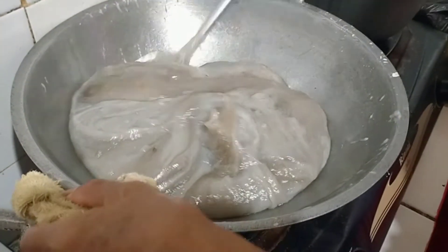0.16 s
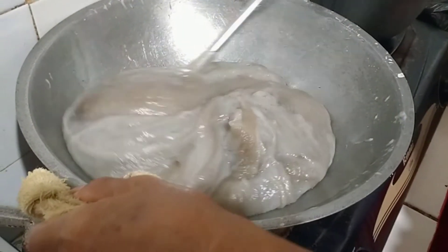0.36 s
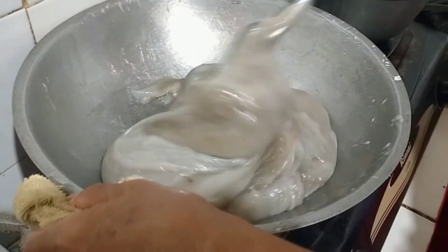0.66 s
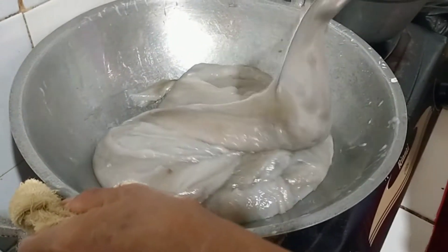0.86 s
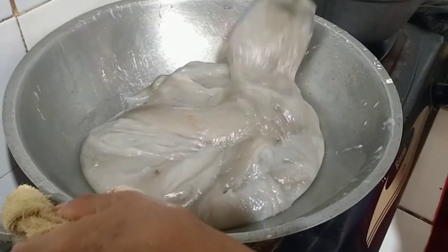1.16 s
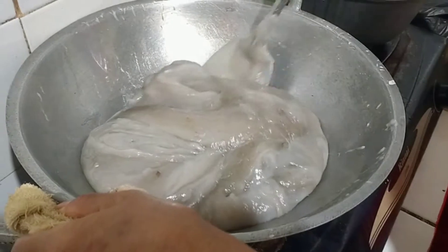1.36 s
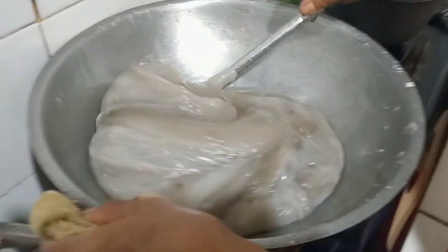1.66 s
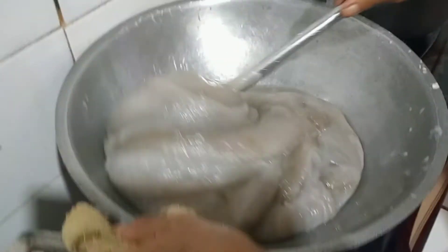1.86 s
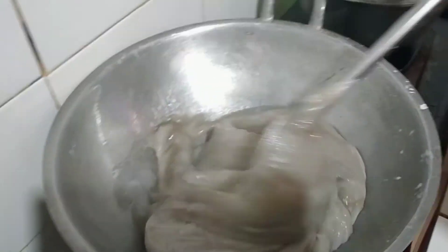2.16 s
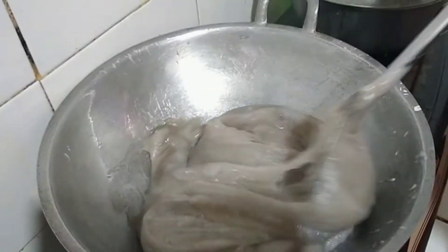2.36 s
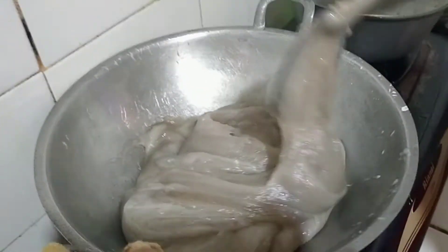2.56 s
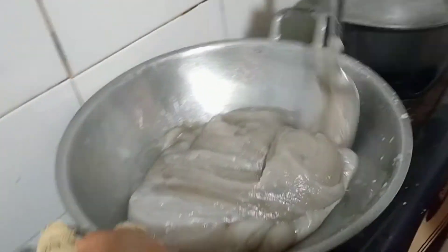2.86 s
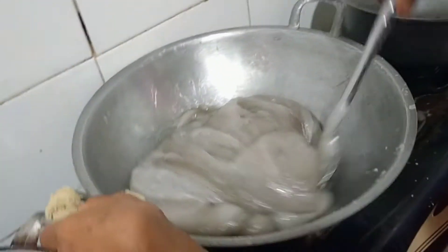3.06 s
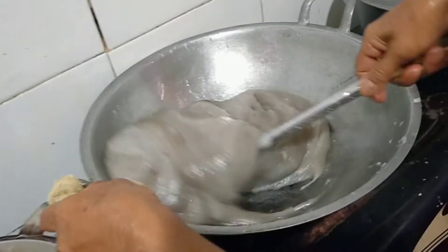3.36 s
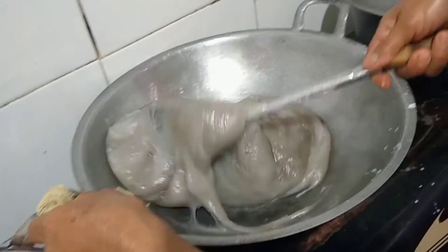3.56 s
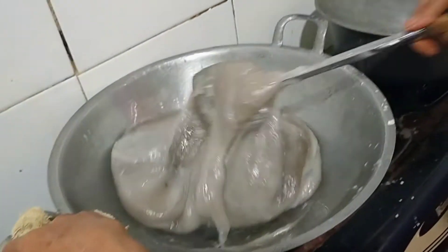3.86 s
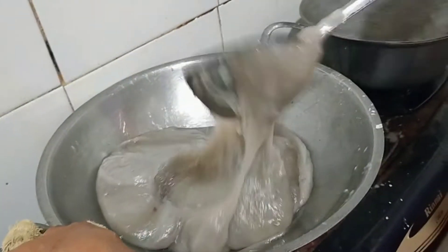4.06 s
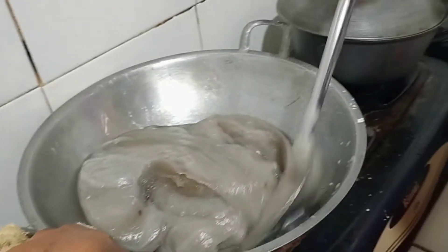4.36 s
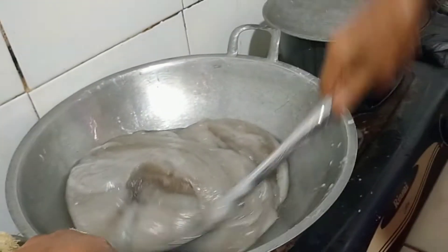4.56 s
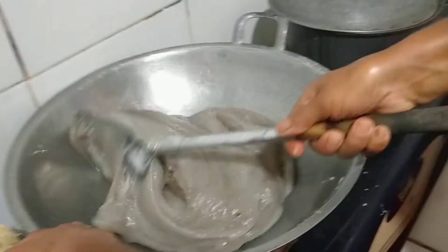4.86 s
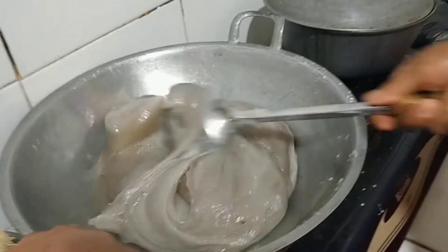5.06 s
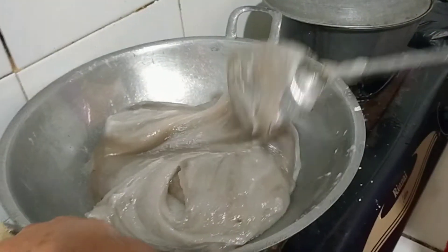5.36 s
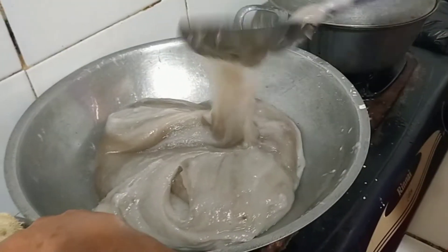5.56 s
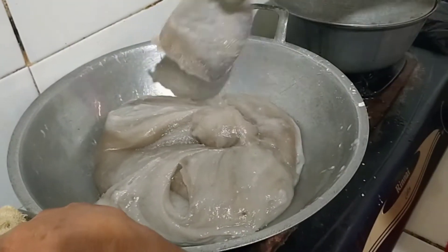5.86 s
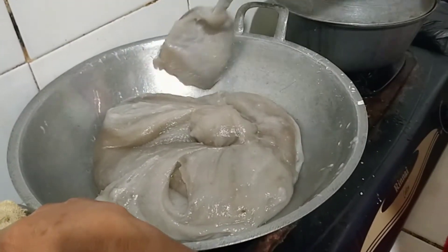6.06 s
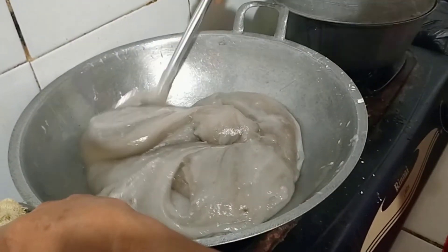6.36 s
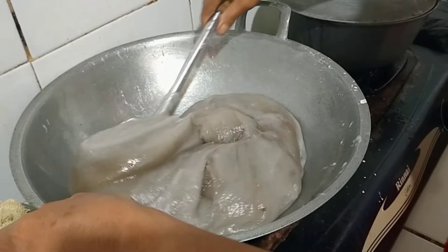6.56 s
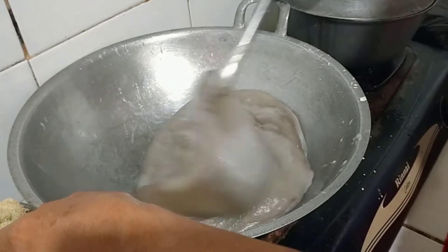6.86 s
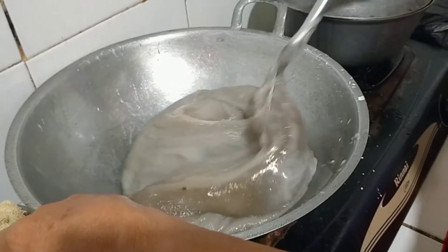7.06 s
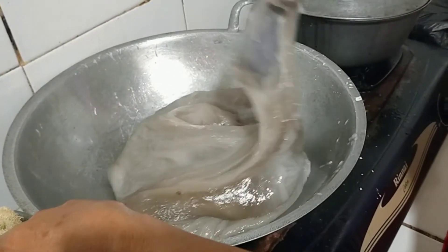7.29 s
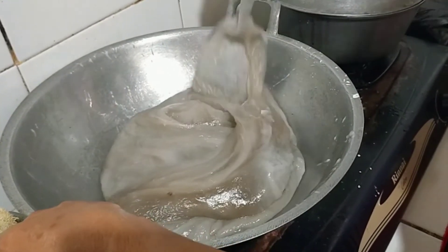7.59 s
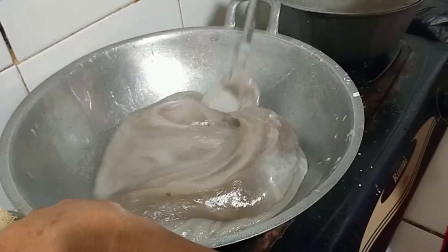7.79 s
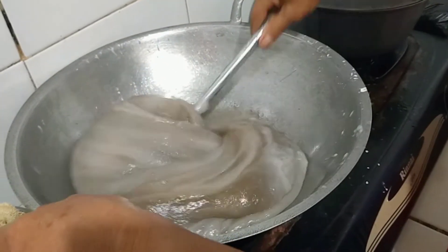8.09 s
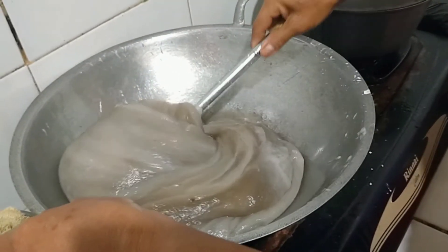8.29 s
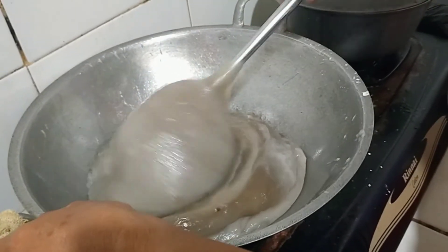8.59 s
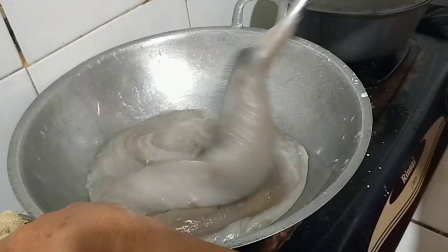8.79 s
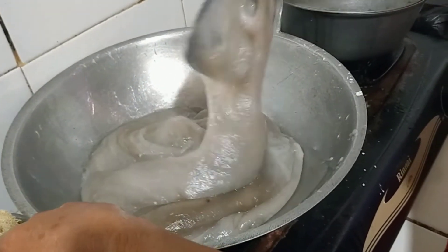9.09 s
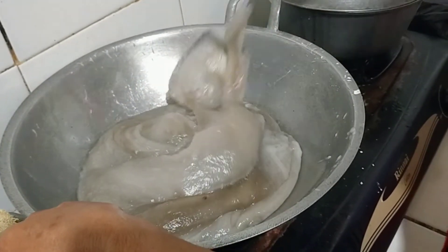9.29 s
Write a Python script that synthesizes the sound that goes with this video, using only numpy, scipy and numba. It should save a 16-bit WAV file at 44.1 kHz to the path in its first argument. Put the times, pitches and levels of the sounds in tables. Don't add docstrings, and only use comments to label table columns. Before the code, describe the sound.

Close-up stirring of heavy dough in a metal wok: rasping steel scrapes, creaking bowl, small ticks, hard clanging knocks over faint kitchen hum.

```python
import sys
import numpy as np
from scipy import signal
from scipy.fft import rfft, irfft
from scipy.io import wavfile
from scipy.ndimage import uniform_filter1d
from numba import njit

SR = 44100
rng = np.random.default_rng(int(sys.argv[2]) if len(sys.argv) > 2 else 0)


def boost_factor(decibels):
    exponent = np.asarray(decibels, float) / 20
    return 10 ** exponent


def transcribe(signal):
    frames = np.atleast_2d(signal).T
    limited = np.clip(frames, -1, 1)
    pcm = np.round(limited * 32767).astype(np.int16)
    wavfile.write(sys.argv[1], SR, pcm)


N = 415863


def unit(x):
    return x / np.sqrt(np.mean(x ** 2))


def steady(x, span_s):
    return x / np.sqrt(uniform_filter1d(x ** 2, int(span_s * SR)) + 1e-12)


def curve(s, values):
    return np.interp(np.arange(N) / SR, s, values)


def decay(t, t60):
    return np.exp(-np.log(1000) * t / t60)


def walk(rate):
    k = int(SR / rate)
    held = np.repeat(rng.standard_normal(N // k + 1), k)
    return 0.5 * uniform_filter1d(uniform_filter1d(held, k), k)[:N]


def band(x, edges):
    return signal.sosfilt(signal.butter(3, edges, "bandpass", fs=SR, output="sos"), x)


def colour(x, table):
    hz, db = np.transpose(table)
    log_hz = np.log(np.fft.rfftfreq(4096, 1 / SR) + 1)
    log_gain = np.interp(log_hz, np.log(hz), db) * np.log(10) / 20
    cep = irfft(log_gain)
    cep = np.r_[cep[0], 2 * cep[1:2048], np.zeros(2048)]
    return signal.fftconvolve(x, irfft(np.exp(rfft(cep))))[:len(x)]


@njit
def svf(x, hz, sharp):
    y, b, l = np.empty(len(x)), 0., 0.
    for i in range(len(x)):
        g = np.tan(np.pi * hz[i] / SR)
        v = (b + g * (x[i] - l)) / (1 + g * (g + 1 / sharp))
        b, l, y[i] = 2 * v - b, l + 2 * g * v, v / sharp
    return y


def focus(x, hz, sharp, share):
    return share * unit(svf(x, hz, sharp)) + (1 - share) * unit(x)


def gestures(rows, rise_db_s, fall_db_s):
    s, held, db = np.transpose(rows)[:3, :, None]
    t = np.arange(N * 1000 // SR + 1) / 1000
    before, after = np.clip(s - t, 0, None), np.clip(t - s - held, 0, None)
    return boost_factor(db - rise_db_s * before - fall_db_s * after) ** 2, t


def centre(power, rows, t, glide_hz_s, rest, rest_hz):
    s, held, _, hz = np.transpose(rows)[:4, :, None]
    hz = hz + glide_hz_s * (np.clip(t - s, 0, held) - held / 2)
    return curve(t, ((power * hz).sum(0) + rest * rest_hz) / (power.sum(0) + rest))


# frequency in Hz, density in dB per Hz.
AIR = [(97, -34), (165, -16), (228, 0.5), (361, -0.5), (420, -3), (529, -7), (665, -6), (717, -9),
       (1630, -5.5), (1760, -9), (3920, -17), (15800, -19)]
# centre in Hz, width in Hz, level in dB.
HUM = [
    (98, 16, -61.5),
    (190.2, 5.8, -76),
    (114.4, 129, -65.5),
    (24.6, 14, -61),
]
# time in seconds, level in dB.
WHINE = [(2.2, -95), (2.6, -72), (3.4, -65.5), (4.3, -65), (4.6, -95)]
# start in seconds, held in seconds, level in dB.
GRIPS = [(.58, 0.23, -58), (1.9, 0.23, -56), (2.8, .15, -62), (3.4, 0.22, -59), (4.4, 0.57, -60),
         (4.8, 1.4, -56.5), (7.1, 0.52, -60), (7.9, 0.2, -62), (8.3, 0.53, -57), (9.3, 0.091, -60)]


def kitchen():
    air = unit(colour(rng.standard_normal(N), AIR)) * boost_factor(-64 + 1.0 * walk(1.5))
    hum = sum(unit(band(rng.standard_normal(N), [hz - w / 2, hz + w / 2])) * boost_factor(db) for hz, w, db in HUM)
    pitch_hz = 1686 * (1 + .001 * walk(6))
    whine = np.sin(2 * np.pi * np.cumsum(pitch_hz) / SR) * boost_factor(curve(*np.transpose(WHINE)) + 2 * walk(9))
    grip, t = gestures(GRIPS, rise_db_s=48, fall_db_s=48)
    hand_db = -70
    rumble = steady(band(rng.standard_normal(N), [36, 60]), 0.058)
    rumble = rumble * curve(t, np.sqrt(grip.sum(0) + boost_factor(2 * hand_db)))
    return air + hum + whine + rumble


# frequency in Hz, density in dB per Hz.
METAL = [(71, -69), (120, -0.5), (185, -1), (388, -4), (598, -6), (677, -3), (885, -1.5), (1780, -4),
         (4000, -5), (5000, -16), (6140, -5), (9460, -13.5), (11400, -7), (15200, -18.5), (16500, -25)]


def sheet(t60):
    t = np.arange(SR // 4) / SR
    return colour(rng.standard_normal(len(t)) * decay(t, t60), METAL)


def slipping_metal():
    slips = rng.standard_normal(N) * boost_factor(2.0 * rng.exponential(size=N) + 3.5 * walk(120) + 3.1 * walk(30))
    slips = unit(slips)
    ringing = sum(signal.oaconvolve(slips * walk(9), sheet(t60=.09)[:SR // 10])[:N] for _ in range(6))
    return unit(colour(slips, METAL)) + boost_factor(-3.0) * steady(ringing, 0.043)


EDGES_HZ = [(1600, 4600), (140, 500), (500, 1600), (4600, 16400)]
# time in seconds, hiss in dB, then against it in dB fine grit and wet sizzle.
SLIDE = [(0, -50, -4.5, 4.5), (.95, -48.5, -5, 2), (1.65, -49, -1, 4), (1.85, -54.5, -3.5, 5),
         (2.15, -51.5, -8, -3), (3.4, -53, -5, 3), (3.852, -58, 2, -1.5), (3.98, -59, -11.5, 12),
         (4.33, -55.5, -18, 4), (4.9, -53, -6, -16), (5.4, -51.5, -6.5, -5), (5.75, -49.5, -1, 1),
         (6.1, -47.5, -2, 2), (6.55, -55, -3, 5), (7.398, -63.5, -10.5, -2), (8.4, -61, -7, -1),
         (8.7, -55, -2.5, 1), (9.43, -55, -10.5, 1)]
# start in seconds, held in seconds, level in dB, edge centre in Hz,
# fine grit against it in dB.
STROKES = [(.05, 0.13, -39, 3400, -10.5), (1.0, 0.12, -55, 2900, 3.5), (1.24, 0.076, -42, 2980, -8),
           (1.37, 0.059, -41, 2920, -7.5), (1.45, 0.082, -44, 3000, -4), (1.57, 0.074, -40.5, 3540, -12),
           (2.215, 0.071, -53.5, 3100, 4.5), (2.3, 0.21, -50.5, 3100, -1.5), (2.56, 0.26, -52, 3100, 1),
           (2.8, 0.024, -39, 3260, -6), (2.85, 0.15, -42, 2940, -6), (3.03, 0.15, -46.5, 3040, -3),
           (3.21, 0.048, -45, 3130, -8), (3.76, 0.056, -54, 3250, -8), (4.392, 0.034, -39, 3180, -7.5),
           (4.465, 0.06, -36.5, 3200, -6.5), (4.59, 0.093, -45.5, 3120, -5.5),
           (4.72, 0.049, -42.5, 3300, -8), (6.09, 0.067, -39, 3220, -5), (6.2, 0.084, -44, 3570, -11),
           (6.33, 0.11, -47.5, 3400, -6.5), (7.79, .2, -55.5, 2920, -11), (8.01, 0.12, -47, 3150, -9.5),
           (9.1, 0.1, -69, 2800, 12), (9.29, 0.036, -61.5, 2860, 4.5)]
# start in seconds, held in seconds, level in dB, edge centre in Hz.
GRAZES = [(0, 0.019, -45, 2650), (.32, 0.14, -59, 2700), (2.02, 0.045, -48.5, 3400),
          (3.59, 0.033, -54, 2980), (5.69, 0.06, -50, 2890), (6.82, 0.029, -52.5, 2900),
          (6.91, 0.024, -50.5, 3200), (6.953, 0.013, -52.5, 2980), (7.195, 0.025, -53.5, 2820),
          (7.272, 0.015, -48.5, 2850), (7.3, 0.016, -52.5, 2500), (7.675, 0.022, -48.5, 3030),
          (7.72, 0.052, -49.5, 3150), (7.877, 0.05, -46.5, 2950), (8.485, 0.016, -52.5, 3060),
          (9.19, 0.083, -56.5, 2880)]
# start in seconds, held in seconds, level in dB, centre in Hz.
GROANS = [(0, 0.058, -44.5, 1250), (.07, 0.037, -45, 1160), (.13, 0.098, -45, 1080),
          (0.322, 0.036, -51, 875), (0.561, 0.023, -56, 820), (1.1, 0.023, -50, 960),
          (1.27, 0.037, -46, 1210), (1.37, 0.17, -44.5, 1070), (1.58, 0.089, -46.5, 840),
          (1.7, 0.22, -58, 734), (2.8, 0.092, -55, 1200), (2.962, 0.036, -40.5, 1070),
          (3.02, 0.13, -47, 900), (3.2, 0.1, -51.5, 870), (3.38, 0.15, -59.5, 760),
          (4.392, 0.14, -51, 1250), (4.6, 0.17, -47, 1180), (4.87, 0.054, -57, 865), (5.68, 0.18, -58, 940),
          (6.08, 0.089, -50.5, 950), (6.2, 0.2, -47, 1020), (6.5, 0.21, -62, 1160),
          (6.82, 0.019, -55.5, 1160), (6.953, 0.017, -60, 1350), (7.195, 0.02, -53, 1030),
          (7.283, 0.018, -52.5, 1130), (7.67, 0.1, -53.5, 1250), (7.84, 0.1, -51.5, 790),
          (7.96, 0.19, -50.5, 630), (8.57, .04, -62, 1000)]
# start in seconds, held in seconds, level in dB, centre in Hz.
ROCKS = [(0, 0.065, -46.5, 250), (.1, 0.11, -49.5, 355), (.32, 0.032, -54, 300), (.43, .03, -55, 400),
         (.49, .2, -51, 352), (.72, 0.24, -60.5, 298), (.89, .05, -55.5, 200), (1.0, 0.063, -55, 400),
         (1.17, 0.028, -50, 159), (1.27, 0.063, -52, 300), (1.37, .3, -47, 280), (2.7, 0.14, -55.5, 201),
         (2.95, 0.41, -49, 280), (3.2, 0.14, -68, 250), (3.6, 0.036, -58, 300), (4.0, 0.018, -66, 280),
         (4.38, 0.23, -56.5, 251), (4.7, 0.084, -56.5, 405), (4.878, 0.053, -57, 178),
         (5.45, 0.11, -59.5, 218), (5.68, 0.073, -58.5, 300), (5.78, 0.053, -48, 303),
         (6.08, 0.25, -49.5, 280), (6.3, 0.24, -58.5, 307), (6.75, 0.22, -63, 320), (7.27, 0.018, -58, 298),
         (7.63, 0.061, -55.5, 300), (7.71, 0.26, -52.5, 219), (8.0, 0.25, -57.5, 490),
         (8.72, 0.04, -59, 350)]


def scrape():
    low_db, slide_bowl_db, bite_bowl_db, graze_grit_db = -18, -10.5, -12.5, -11.5
    sizzle_hz = 11500
    bites = STROKES + [(*row, graze_grit_db) for row in GRAZES]
    (stroke, t), (groan, _), (rock, _) = (gestures(rows, 425, 211) for rows in (STROKES, GROANS, ROCKS))
    bite = np.vstack([stroke, gestures(GRAZES, rise_db_s=900, fall_db_s=448)[0]])
    s, slide_db, grit_db, sizzle_db = np.transpose(SLIDE)
    flicker_db = 1.5 * walk(14)[::SR // 1000][:len(t)]
    slide = boost_factor(np.interp(t, s, slide_db) + flicker_db) ** 2
    slide_low = slide * boost_factor(2 * low_db)
    light = slide * boost_factor(2 * slide_bowl_db) + bite.sum(0) * boost_factor(2 * bite_bowl_db)
    grit = slide * boost_factor(2 * np.interp(t, s, grit_db)) + boost_factor(2 * np.transpose(bites)[4]) @ bite
    powers = [slide + bite.sum(0), slide_low + rock.sum(0), light + groan.sum(0), grit]

    edge_hz = centre(bite, bites, t, 380, slide, 2870)
    bowl_hz = centre(groan, GROANS, t, -600, light, 997)
    stand_hz = centre(rock, ROCKS, t, 0, slide_low, 280)
    edge_hz = 3100 * (edge_hz / 3100) ** 1.5
    bowl_hz = 950 * (bowl_hz / 950) ** 1.14

    metal = slipping_metal()
    edge, stand, bowl, fine = [band(metal, edges) for edges in EDGES_HZ]
    edge = focus(edge, edge_hz, sharp=2.18, share=0.78)
    stand = focus(stand, stand_hz, sharp=2.9, share=0.33)
    bowl = focus(bowl, bowl_hz, sharp=1.82, share=1.0)
    sizzle = boost_factor(curve(s, sizzle_db)) * band(fine, [sizzle_hz, 19500])
    fine = band(fine, [3000, sizzle_hz]) - sizzle
    parts = [edge, stand, bowl, fine]
    return sum(steady(part, 0.14) * curve(t, np.sqrt(power)) for part, power in zip(parts, powers))


def ring(hz, db, t60, turns):
    t = np.arange(SR // 4)[:, None] / SR
    return (np.sin(2 * np.pi * (hz * t + turns)) * decay(t, t60)) @ boost_factor(db)


LANDINGS_S = [1.157, 2.777, 4.35, 6.04, 9.42]
# frequency in Hz, level in dB,
# 60 dB decay in seconds.
WOK = [
    [(1000, 12, 0.056), (1830, -9, 0.13), (2370, -6.5, 0.14), (2650, 1.5, 0.065), (3580, -6, 0.065),
     (3680, 1, 0.031), (4010, -12, 0.074)],
    [(1860, -21, 5.0), (2810, -10, 4.1), (2800, -25, 5.0), (3850, -5, 2.9), (4140, -2, 0.028)],
    [(1250, 3, 0.071), (2340, -2, 0.05), (2610, -5, 0.11), (3250, -3, 0.16), (3700, -2, 0.06),
     (4320, -10, .15), (4400, -24, .15)],
    [(930, 8.5, 0.098), (1840, -6, 0.064), (2110, 2.5, 0.064), (2276, -9.5, 0.22), (2590, -2.5, 0.073),
     (2780, -6, 0.16), (3150, -7, .11), (3360, -4.5, 0.12), (4040, 2.5, 0.035)],
    [(2170, -3, 0.045), (2450, 0, 0.13), (2940, -10, 0.075)],
]


def blows(table, modes_db, scatter_db, ring_s, crack_db):
    out, t = np.zeros(N + SR), np.arange(SR // 4) / SR
    for (s, peak_db, *rel), luck in zip(table, rng.standard_normal((len(table), 2, 9))):
        stroke = max(np.searchsorted(LANDINGS_S, s + .01) - 1, 0)
        hz, db, t60 = np.transpose(WOK[stroke])
        level_luck, phase_luck = luck[:, :len(hz)]
        strong = ring(hz, db + scatter_db * level_luck, np.clip(t60, .03, .4), phase_luck)
        crack = unit(colour(t == 0, METAL)) * boost_factor(crack_db)
        sound = decay(t, ring_s) * (unit(sheet(t60=0.2)) + crack + boost_factor(modes_db) * unit(strong))
        at = int(s * SR)
        for edges, rel_db in zip(EDGES_HZ, [0] + rel):
            part = band(sound, edges)
            out[at:at + len(t)] += part / np.abs(part).max() * boost_factor(peak_db + rel_db)
    return out[:N]


# start in seconds, peak in dB, then against it in dB thud, bowl and crack.
TAPS = [(0.0377, -23, -8, -21, -21), (0.3522, -25.5, -22, -7, -15), (0.507, -29, -10, -12, -11),
        (0.663, -34, -13, 4, -17), (0.932, -41, -23, 9, -20), (1.0936, -24, -31, -14, -12),
        (2.9692, -21.5, -21, -8, -16), (3.6094, -33.5, -28, -4, -15), (4.1919, -36, -27, -4, -25),
        (4.6314, -21.5, -17, -22, -6), (5.7094, -52, -15, -16, -14), (7.193, -41, -21, 1, -16),
        (7.27, -32.5, -12, -14, -15), (7.6185, -38, 0, 9, -2), (7.655, -26, -23, -19, -6),
        (7.889, -41, -19, -14, -13), (8.2851, -43.5, -21, -15, 8.5), (8.4791, -29.5, -17, -14, -2)]


def light_taps():
    return blows(TAPS, modes_db=-16.0, scatter_db=15, ring_s=0.17, crack_db=-11.5) * boost_factor(-8.5)


def sing(tables, sharp, offset_db):
    out, slips = 0, rng.standard_normal(N) * boost_factor(6 * walk(60) + 2 * rng.exponential(size=N))
    for rows in tables:
        s, hz, db = np.transpose(rows)
        a, b = int(max(s[0] - .1, 0) * SR), int((s[-1] + .1) * SR)
        hz, tone = curve(s, hz)[a:b], np.zeros(N)
        tone[a:b] = steady(svf(svf(slips[a:b], hz, sharp), hz, sharp), .08)
        level_db = curve(np.r_[s[0] - .02, s, s[-1] + .04], np.r_[-90, db + offset_db, -90])
        out = out + tone * boost_factor(level_db)
    return out


# time in seconds, centre in Hz, level in dB.
CAVITY = [
    [(0.05, 1030, -53), (0.068, 1060, -40), (0.112, 1040, -28), (0.132, 1070, -52), (0.204, 930, -45),
     (0.26, 1020, -65), (0.27, 1010, -60)],
    [(1.37, 979, -62), (1.408, 950, -38.5), (1.506, 880, -45.5), (1.54, 885, -42), (1.574, 850, -49),
     (1.596, 951, -44), (1.618, 968, -55), (1.674, 830, -51), (1.72, 730, -63)],
    [(2.94, 930, -51), (2.968, 950, -42), (3.004, 910, -49), (3.022, 929, -44), (3.098, 740, -48),
     (3.13, 736, -42), (3.18, 821, -46), (3.312, 647, -39.5), (3.4, 631, -56)],
    [(4.44, 1060, -56), (4.464, 1020, -54), (4.488, 1020, -44), (4.514, 1020, -50), (4.55, 1010, -41),
     (4.568, 1000, -48), (4.58, 977, -48)],
]


def cavity():
    return sing(CAVITY, sharp=7., offset_db=-3)


# start in seconds, peak in dB, then against it in dB thud, bowl and crack.
TICKS = [(0.333, -42, -2, -1, -20), (0.5043, -34, -14, -5, -12), (0.6595, -29.5, -17, -6, -9),
         (0.9297, -34, -15, 3.5, -18), (6.7835, -39, -15, -15, 5), (7.6255, -38.5, -14, 4, -1),
         (7.653, -37, -20, -8, -10), (7.684, -36, -22, -15, -10), (7.725, -45, 4, -5, -14),
         (7.856, -46, 7, 5, -14), (9.402, -31, -20, -23, -14)]


def dry_ticks():
    return blows(TICKS, modes_db=-20, scatter_db=6, ring_s=.03, crack_db=9)


# start in seconds, peak in dB, then against it in dB thud, bowl and crack.
KNOCKS = [(1.1575, -10.5, -48, -38, -4), (1.1645, -18, -42, -18, 4), (1.1735, -26, -26, -8.5, -20),
          (2.7783, -18.5, -23, -9.5, 2.5), (2.785, -18, -32, -17.5, -3), (4.3503, -10, -30.5, -22, 2),
          (4.3606, -22, -16.5, -6, -7), (6.0412, -8, -27, -26, 2.5), (6.0525, -15.5, -15, -7.5, -15),
          (6.0595, -8.5, -30, -15, -2), (9.4212, -17, -26, -13, -11)]


def hard_knocks():
    return blows(KNOCKS, modes_db=3.0, scatter_db=1.5, ring_s=0.1, crack_db=-8)


# time in seconds, centre in Hz, level in dB.
BLADE = [
    [(2.22, 3640, -61), (2.302, 3490, -48), (2.506, 3670, -46), (2.512, 3710, -53), (2.74, 3380, -48)],
    [(2.815, 3990, -43), (2.881, 3740, -51.5), (2.93, 3800, -38)],
    [(3.17, 3500, -48), (3.208, 3550, -50), (3.252, 3590, -37), (3.33, 3420, -46)],
    [(4.39, 3760, -40), (4.538, 4020, -37), (4.58, 3800, -45), (4.772, 3700, -39.5), (4.8, 3660, -50)],
    [(6.29, 3640, -48), (6.302, 3750, -52), (6.314, 3780, -42), (6.444, 3770, -41.5), (6.47, 3700, -46)],
    [(8.0, 3200, -57), (8.012, 3170, -57), (8.08, 3700, -42), (8.132, 3630, -54), (8.16, 3470, -56)],
]


def blade():
    return sing(BLADE, sharp=4.6, offset_db=-3.5)


# start in seconds, first and last pitch in Hz, length in seconds, level in dB.
SQUELCH = [
    (7.621, 1300, 1300, 0.019, -38.5),
    (7.653, 1570, 1960, 0.016, -41),
    (7.759, 1700, 1700, 0.032, -44.5),
    (8.004, 4100, 3000, 0.051, -54),
    (7.719, 220, 220, 0.024, -43),
    (3.39, 650, 615, 0.153, -52),
    (7.762, 250, 200, .015, -44),
    (7.788, 227, 226, 0.017, -42),
    (7.83, 220, 229, 0.034, -46),
    (7.88, 3100, 2600, .03, -50),
]


def squelches():
    out = np.zeros(N)
    for s, from_hz, to_hz, length, db in SQUELCH:
        u = np.linspace(0, 1, int(length * SR))
        flutter_s = 3 / from_hz + length / 40
        flutter = unit(uniform_filter1d(rng.standard_normal(SR), int(flutter_s * SR)))[:len(u)]
        pitch_hz = from_hz + (to_hz - from_hz) * np.sqrt(u)
        tone = np.sin(2 * np.pi * np.cumsum(pitch_hz) / SR)
        swell = np.sqrt(np.sin(np.pi * np.sqrt(u)))
        out[int(s * SR):][:len(u)] += boost_factor(db) * swell * (.4 + flutter) * tone
    return out


def tiles(x):
    t = np.arange(SR // 2) / SR
    tail = band(rng.standard_normal(len(t)), [150, 7000]) * decay(t, 0.3) * (t > .004)
    return x + boost_factor(-10) * signal.fftconvolve(x, tail / np.linalg.norm(tail))[:N]


def scene():
    hits = hard_knocks() + light_taps() + squelches() + dry_ticks()
    rest = scrape() + cavity() + blade() + kitchen()
    top = signal.ellip(10, .2, 60, 15830, fs=SR, output="sos")
    return (tiles(hits) + signal.sosfilt(top, rest))[None]


def top_cut(x):
    return signal.sosfilt(signal.butter(12, 16820, fs=SR, output="sos"), x)


def record(dry):
    return top_cut(dry)


dry = scene()
out = record(dry)
transcribe(out)
```